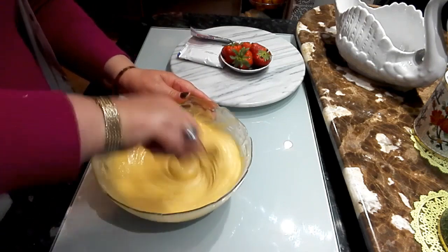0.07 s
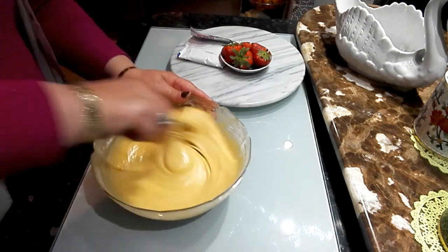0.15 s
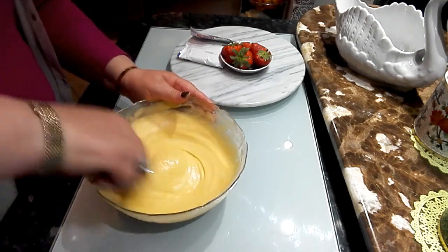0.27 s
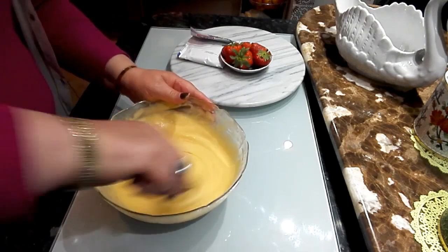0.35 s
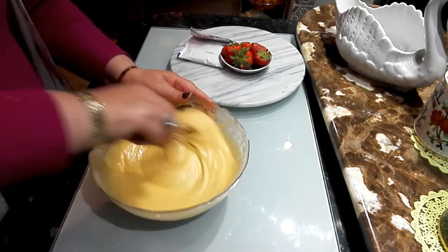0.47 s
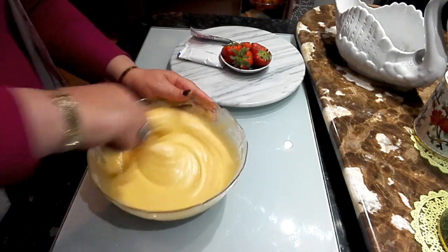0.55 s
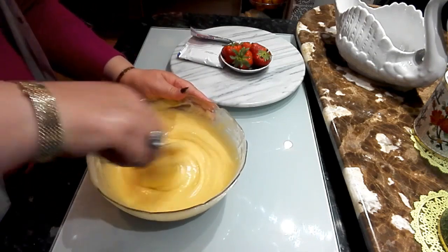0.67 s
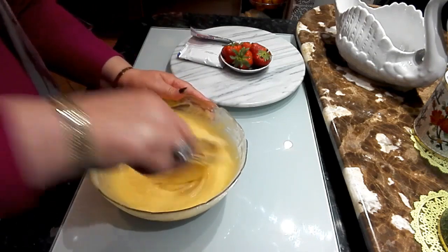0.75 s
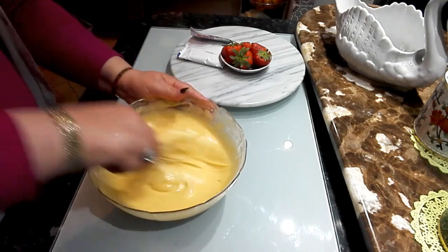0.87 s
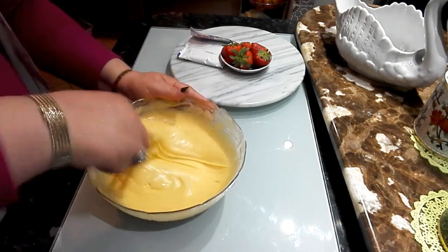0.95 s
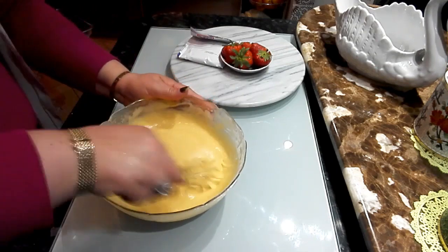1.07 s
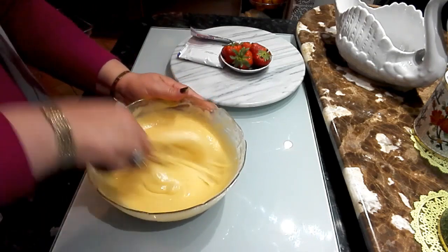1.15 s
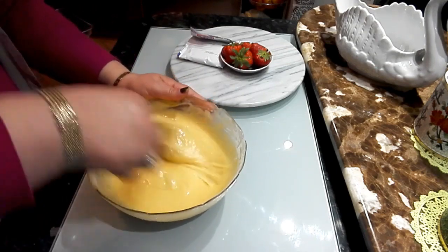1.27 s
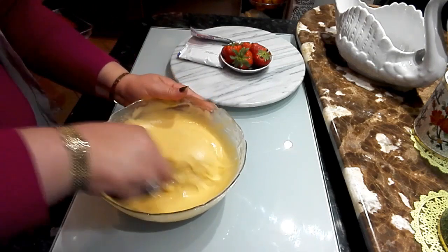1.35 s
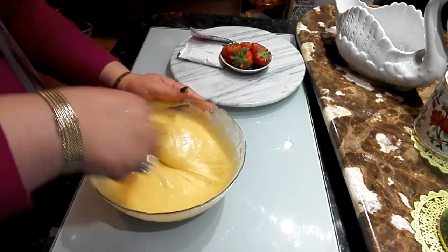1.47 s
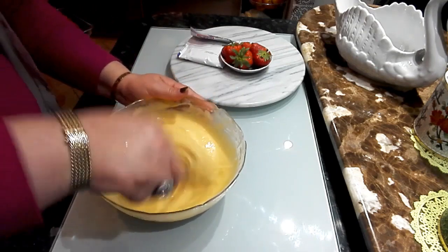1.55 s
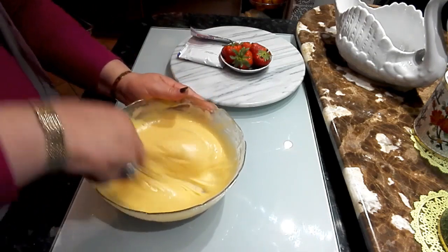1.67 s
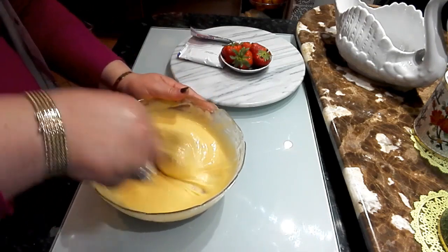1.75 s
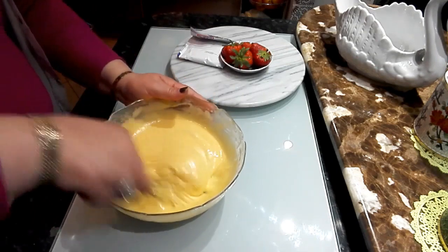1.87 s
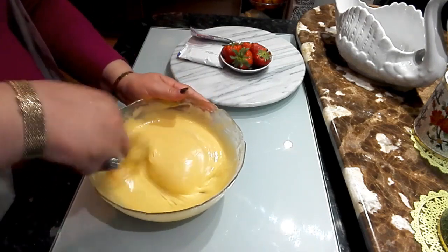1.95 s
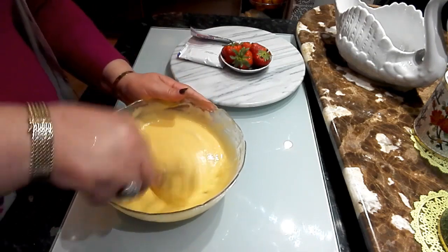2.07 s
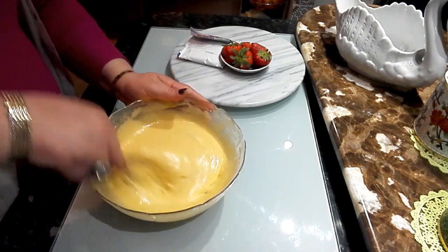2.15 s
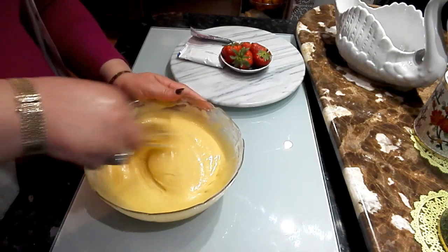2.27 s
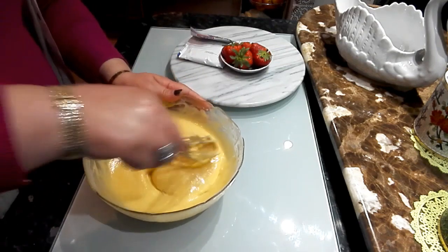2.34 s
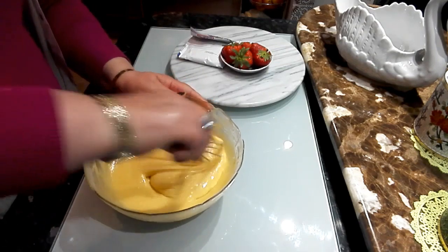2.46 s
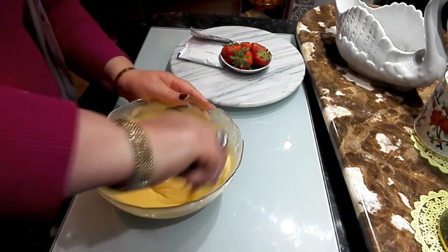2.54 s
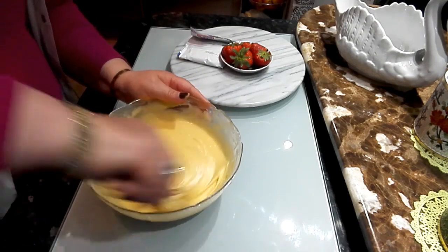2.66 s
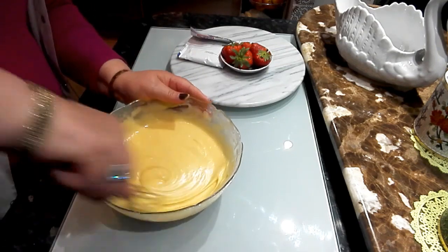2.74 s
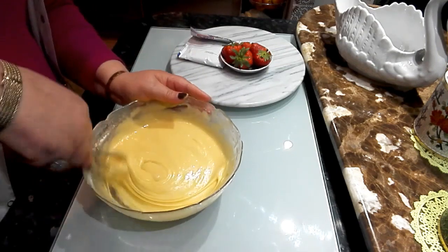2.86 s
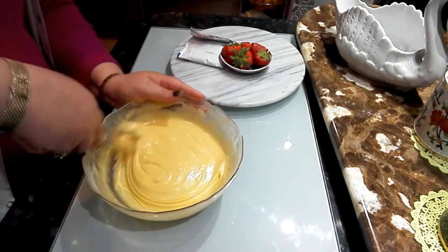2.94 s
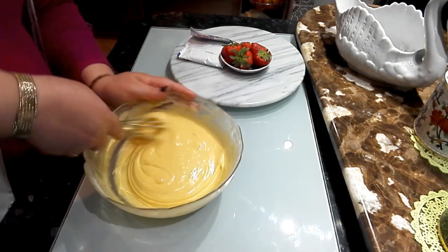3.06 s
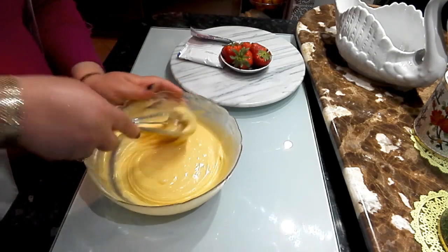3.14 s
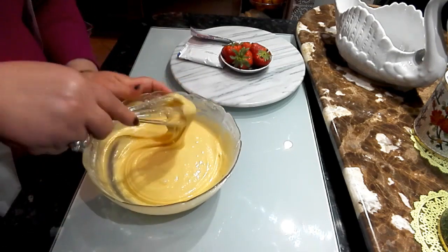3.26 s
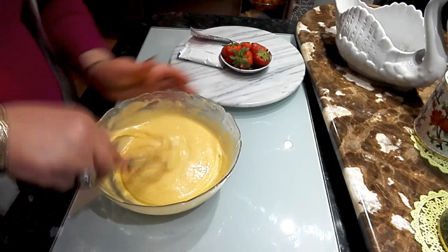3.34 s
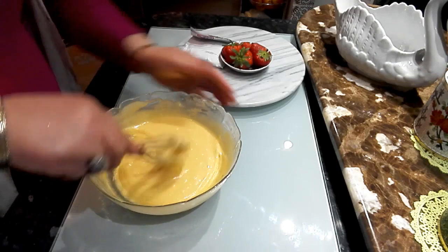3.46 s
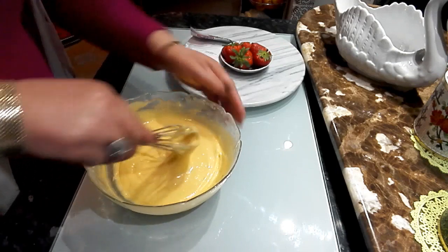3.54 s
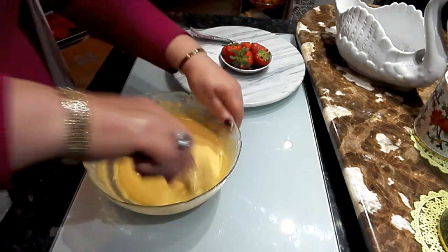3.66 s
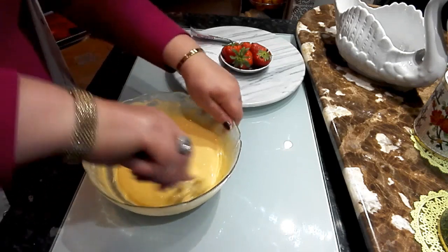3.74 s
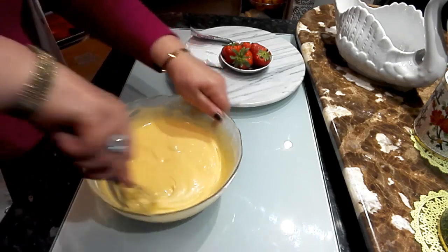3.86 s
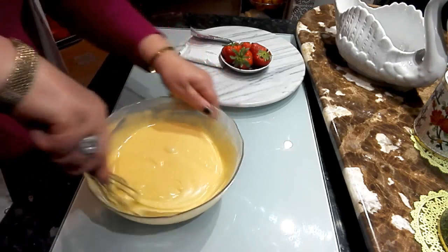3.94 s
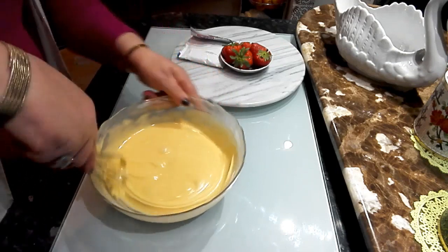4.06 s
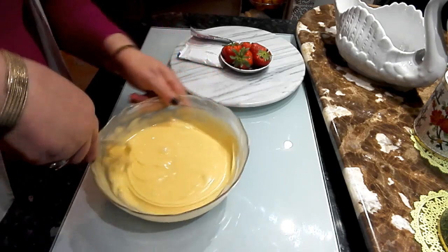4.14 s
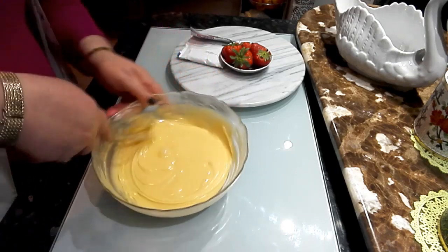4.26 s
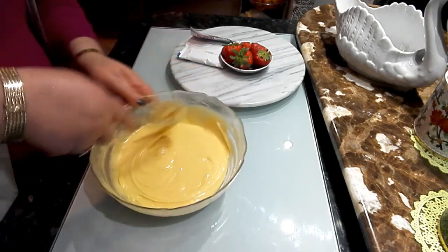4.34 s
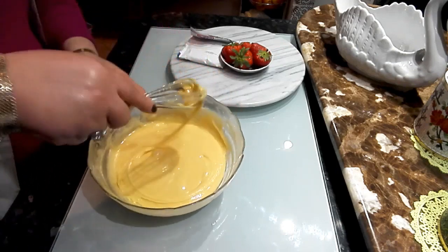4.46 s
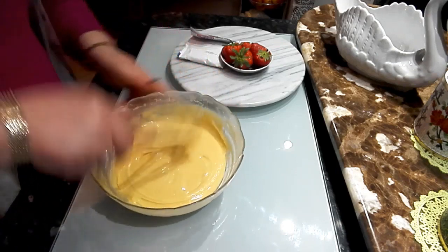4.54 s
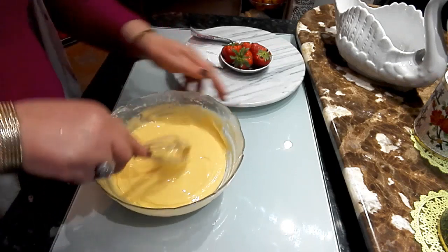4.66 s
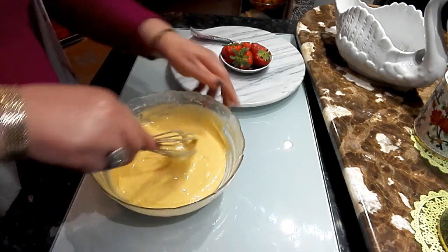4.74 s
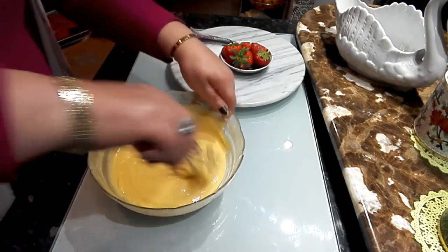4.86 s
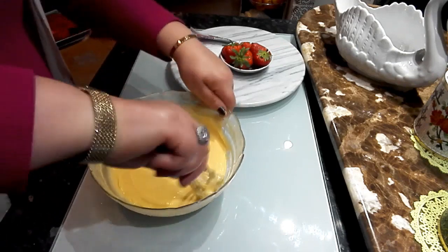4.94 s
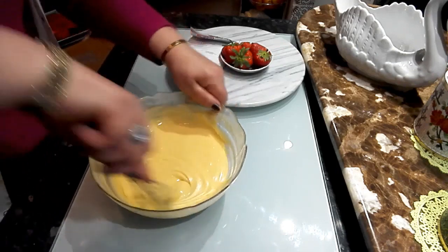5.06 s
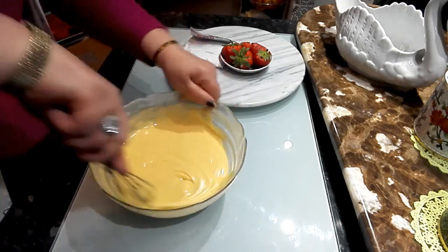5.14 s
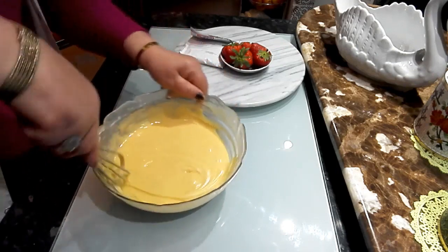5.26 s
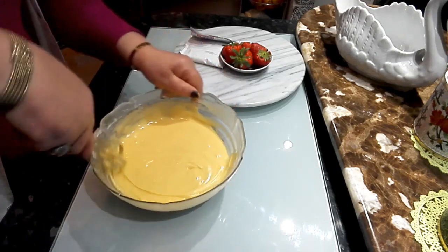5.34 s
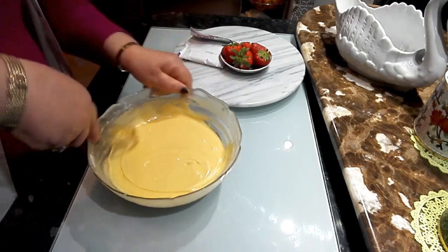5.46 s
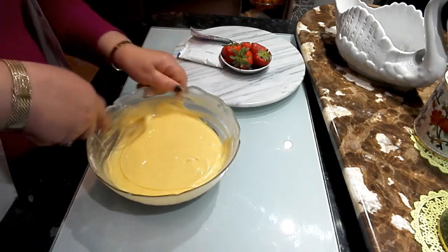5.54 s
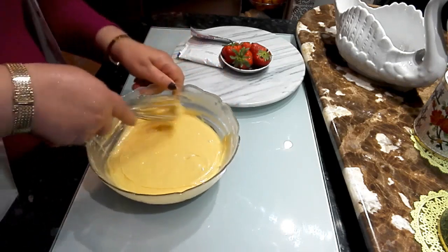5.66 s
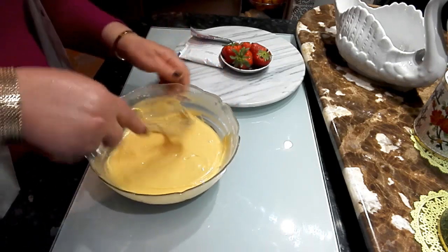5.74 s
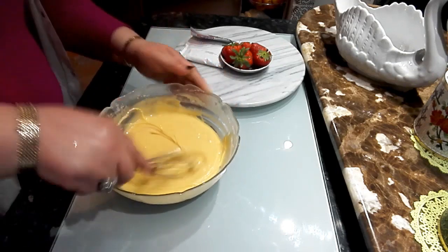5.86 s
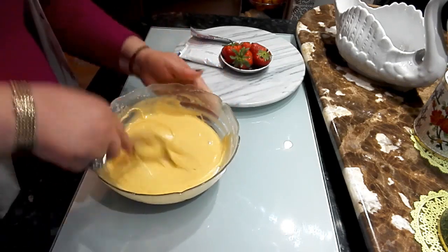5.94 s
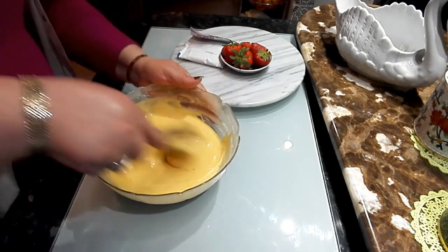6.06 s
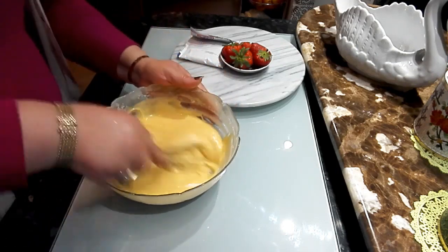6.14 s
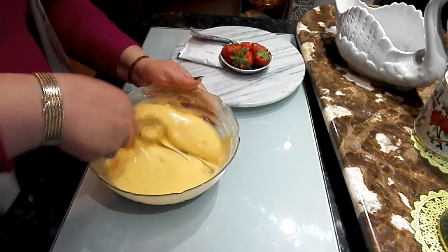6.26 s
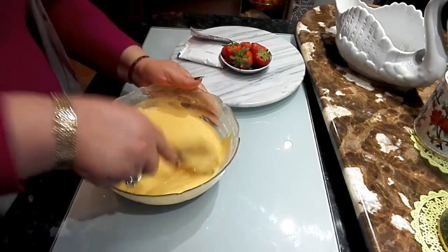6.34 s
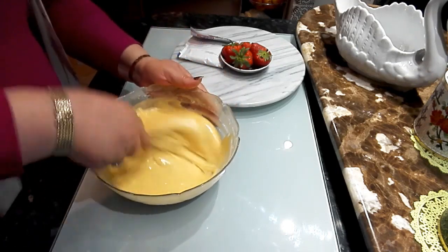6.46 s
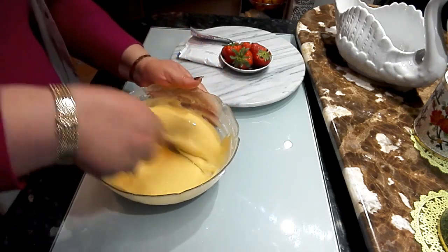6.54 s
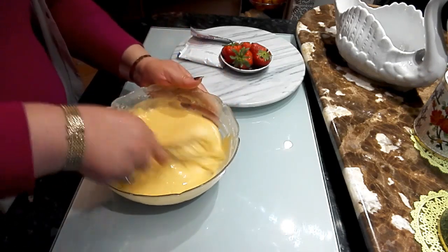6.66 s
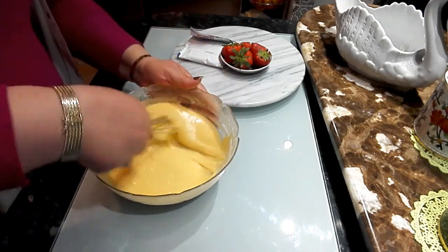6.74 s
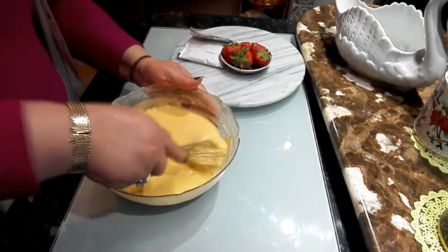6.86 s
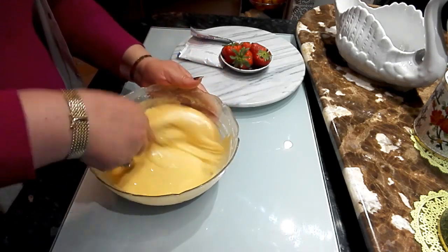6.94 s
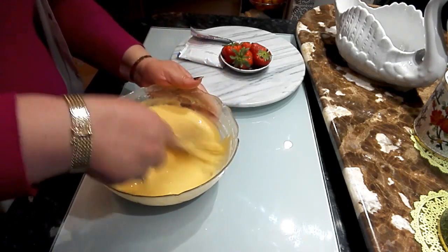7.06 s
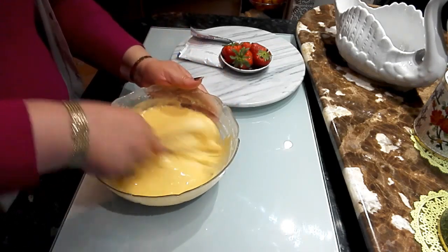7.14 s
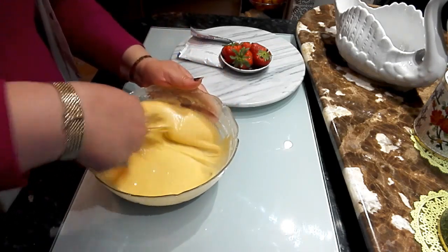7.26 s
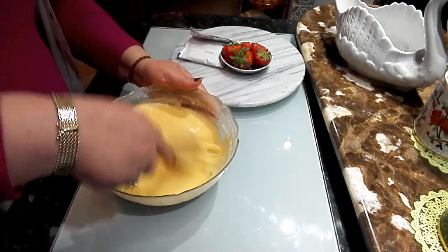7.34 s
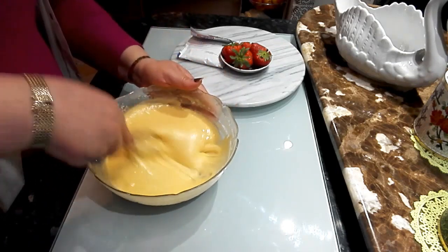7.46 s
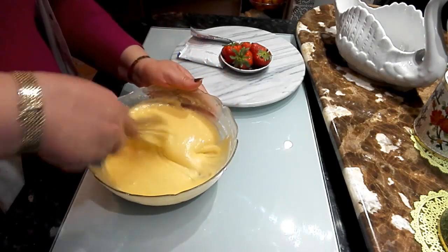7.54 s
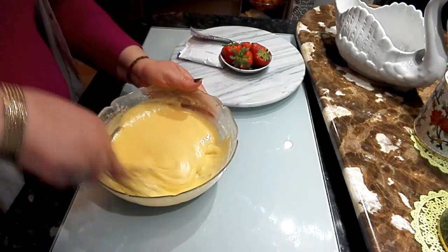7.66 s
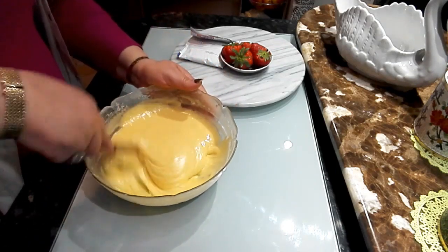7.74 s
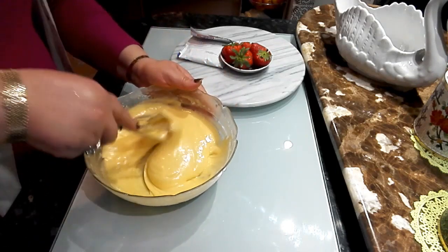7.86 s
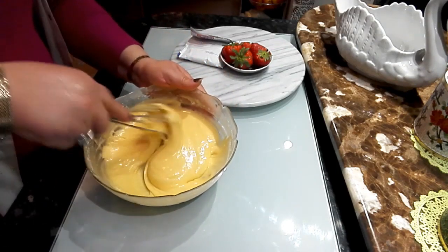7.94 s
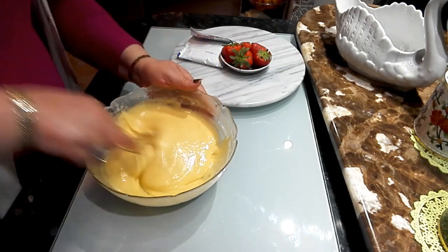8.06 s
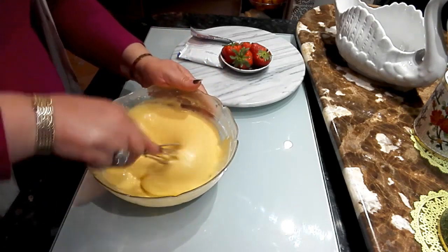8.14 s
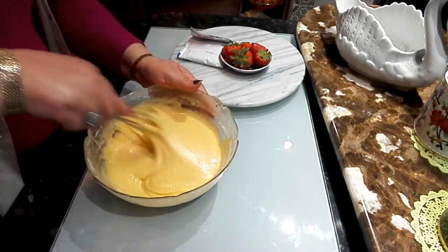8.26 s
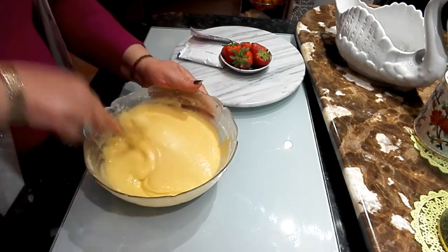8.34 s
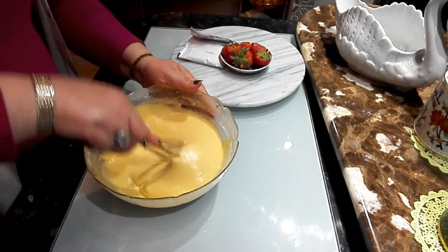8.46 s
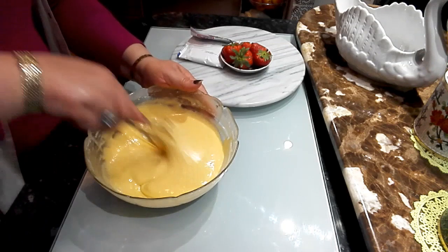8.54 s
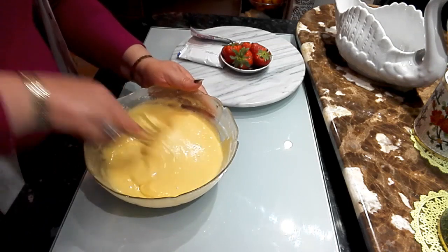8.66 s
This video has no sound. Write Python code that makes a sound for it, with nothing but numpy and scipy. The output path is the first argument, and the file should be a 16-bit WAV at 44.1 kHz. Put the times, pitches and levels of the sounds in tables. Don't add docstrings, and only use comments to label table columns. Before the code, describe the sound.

Close to the microphone, a wire whisk beats batter in a glass bowl, about four strokes a second, each a clustered tick and short scrape. Hard knocks stand out. A quieter middle has light wiping, scattered clacks and brief glassy rings, then fast beating resumes to the end. A small hard kitchen answers, with a faint refrigerator hum behind.

```python
import sys
import numpy as np
from scipy import signal
from scipy.fft import rfft, irfft, next_fast_len
from scipy.io import wavfile
from scipy.ndimage import uniform_filter1d, map_coordinates

SR = 44100
rng = np.random.default_rng(int(sys.argv[2]) if len(sys.argv) > 2 else 0)


def generate_wav(sig):
    pcm = np.round(np.clip(np.atleast_2d(sig).T, -1, 1) * 32767).astype(np.int16)
    wavfile.write(sys.argv[1], SR, pcm)


def gain_from_db(level_db):
    decades = np.asarray(level_db, float) / 20
    return 10 ** decades


N = 383669


def unit(x):
    return x / np.sqrt(np.mean(x ** 2) + 1e-20)


def along(points, hz):
    f, v = np.transpose(points)
    return np.interp(np.log(hz + 1), np.log(f + 1), v)


def wobble(rate):
    coarse = np.arange(0, N + 32, 32)
    knots = rng.standard_normal(int(N * rate / SR) + 4)
    return np.interp(np.arange(N), coarse, map_coordinates(knots, [coarse * rate / SR]))


def filtered(x, response):
    m = next_fast_len(N + SR // 2)
    return irfft(rfft(x, m) * response(np.fft.rfftfreq(m, 1 / SR)), m)[:N]


def resonant(x, peaks):
    f = np.fft.rfftfreq(8192, 1 / SR)
    response = 0
    for k, (hz, width_hz, db) in enumerate(peaks):
        damping = 1j * f * width_hz
        response = response + (-1) ** k * gain_from_db(db) * damping / (hz * hz - f * f + damping)
    kick = irfft(response)
    return signal.oaconvolve(x, kick[:6000] / np.abs(kick).max())[:N]


def ring(hz, db, t60, seconds):
    t = np.arange(round(seconds * SR)) / SR
    return gain_from_db(db - 60 * t / t60) * np.sin(2 * np.pi * hz * t) * (1 - np.exp(-2 * hz * t))


def add(track, s, sound):
    track[round(s * SR):][:len(sound)] += sound


# landing t/s, contact t/s, landing level/dB, lift level/dB, lift sharpness/dB
STROKES = [(0.099, 0.13, -78, -48.5, -11), (0.457, 0.12, -78, -44.5, -11.5),
           (0.897, 0.087, -62.5, -46, -13.5), (1.176, 0.079, -47.5, -45.5, -8.5),
           (1.439, 0.066, -42.5, -45.5, -0.5), (1.689, 0.07, -38.5, -42.5, -7),
           (1.941, 0.048, -43.5, -43.5, -8), (2.225, 0.038, -56.5, -47.5, -9.5),
           (5.96, 0.062, -53.5, -45, -8), (6.229, 0.087, -63.5, -42.5, -13.5), (6.5, 0.081, -43, -48, -16),
           (6.73, 0.078, -50.5, -45, -16.5), (6.972, 0.085, -54, -52.5, -19.5),
           (7.208, 0.09, -60.5, -47.5, -20), (7.47, 0.071, -64.5, -44.5, -6),
           (7.737, 0.084, -55.5, -59.5, -19), (8.123, 0.12, -51.5, -46.5, -8),
           (8.447, 0.086, -54.5, -41.5, -12)]


def strokes():
    skid_s, skid_db = 0.017, 10
    release_s, release_db = 0.08, -41.5
    landing_dull_db, release_dull_db = -7, -8
    moves = []
    for s, hold_s, land_db, lift_db, sharp_db in STROKES:
        moves.append([
            (s, land_db + skid_db, sharp_db + landing_dull_db),
            (s + skid_s, land_db, sharp_db + landing_dull_db),
            (s + max(hold_s, skid_s + .002), lift_db, sharp_db),
            (s + hold_s + release_s, lift_db + release_db, sharp_db + release_dull_db)])
    return moves


# t/s, peak level/dB, contact pitch f/Hz, sharpness level/dB
LANDINGS = [(0.093, -41, 4740, -22), (0.4592, -39, 4470, -18.5), (0.902, -43, 3360, -29),
            (1.1761, -21, 2020, -38.5), (1.4387, -5, 3800, -26.5), (1.6878, -9.5, 1730, -17.5),
            (1.9402, -28.5, 3660, -34), (2.2232, -44, 2840, -18), (2.6349, -51, 1550, -24),
            (3.4797, -9.5, 5070, -13.5), (3.801, -42, 1460, -22), (4.6816, -20.5, 4160, -16),
            (5.0358, -10.5, 4550, -20.5), (5.963, -15, 3270, -18), (6.2292, -34, 4400, -32),
            (6.4962, -3.5, 5500, -19.5), (6.73, -26, 1980, -43), (6.9686, -29.5, 2330, -35),
            (7.214, -23.5, 1760, -33), (7.4763, -47, 4320, -17), (7.738, -36.5, 3570, -44),
            (8.1143, -31.5, 4140, -23.5), (8.4367, -34, 4770, -15.5)]
# t/s, peak level/dB, contact pitch f/Hz
FOLLOWERS = [(0.1297, -29.5, 5430), (0.2128, -28.5, 3080), (0.22, -47, 5000), (0.237, -40, 3130),
             (0.2425, -33.5, 2030), (0.502, -41, 5450), (0.547, -33.5, 4040), (0.581, -45, 1470),
             (0.939, -38, 3900), (0.954, -35, 4560), (0.961, -39, 4560), (0.976, -41, 3280),
             (0.982, -39, 5070), (1.182, -26, 5600), (1.2, -29, 2970), (1.251, -33, 2740),
             (1.2563, -24.5, 3220), (1.961, -27.5, 5040), (5.9953, -25, 2370), (6, -32, 1450),
             (6.002, -31.5, 3800), (6.014, -39, 4200), (6.037, -35, 5570), (6.2302, -41, 1510),
             (6.269, -30.5, 1510), (6.296, -30.5, 2330), (6.2685, -24.5, 3050), (6.3124, -24.5, 3760),
             (6.4923, -25, 3270), (6.5003, -26, 5320), (6.504, -27, 5450), (6.555, -29, 3000),
             (6.7255, -40, 1600), (6.772, -36, 4750), (6.804, -38, 4730), (6.811, -33, 4400),
             (6.8163, -32, 3660), (6.976, -36.5, 4920), (7.0319, -41, 3250), (7.0485, -35, 3580),
             (7.0607, -35.5, 4750), (7.064, -37, 3210), (7.214, -27, 4230), (7.2285, -39, 5050),
             (7.2695, -38, 1910), (7.289, -44, 4260), (7.298, -39.5, 4240), (7.303, -32, 3220),
             (7.3036, -34, 1800), (7.482, -52, 7500), (7.503, -36, 5450), (7.5382, -34, 4400),
             (8.125, -31.5, 5520), (8.1259, -31, 1450), (8.1539, -30.5, 5300), (8.181, -36, 4860),
             (8.186, -36, 1710), (8.191, -41, 4500), (8.207, -27.5, 3420), (8.449, -23.5, 4700),
             (8.4902, -25, 5200), (8.508, -27, 1400), (8.536, -31.5, 7100), (8.545, -26.5, 2320)]
# t/s, peak level/dB, contact pitch f/Hz
GRAZES = [(0.0054, -50.5, 2730), (0.144, -51, 5500), (0.159, -44, 5200), (0.205, -41, 4900),
          (0.356, -34.5, 4280), (0.5298, -41, 5060), (0.643, -55, 1550), (0.6853, -55, 4470),
          (2.7714, -55.5, 1520), (2.802, -54, 1540), (2.8066, -49.5, 5900), (2.8379, -51, 6800),
          (2.874, -48.5, 4770), (2.994, -51, 3440), (3.016, -38.5, 7150), (3.023, -43, 3360),
          (3.046, -47, 3400), (3.1418, -58.5, 5800), (3.488, -35, 5030), (3.7, -70, 4300),
          (3.9671, -52, 4700), (3.9803, -41, 4570), (4.0496, -45, 5943), (4.0708, -47.5, 4400),
          (4.1006, -51, 3660), (4.126, -49, 3840), (4.135, -41.5, 4540), (4.16, -49, 5540),
          (4.1784, -41.5, 5630), (4.2179, -49, 1320), (4.2837, -58, 3430), (5.24, -55.5, 4540),
          (5.271, -56, 3800), (5.3073, -44, 4550), (5.3318, -47, 4570), (6.866, -52, 4830),
          (7.1102, -53, 4930), (7.3652, -46.5, 4950), (7.469, -59, 4320), (7.4938, -36.5, 1460),
          (7.609, -51, 2900), (7.702, -61, 4340), (7.748, -45, 3550), (7.814, -46, 4900),
          (7.8282, -28, 5000), (7.861, -46, 4640)]
# t/s, peak level/dB
SNAPS = [(0.123, -36), (0.2683, -41), (0.476, -39), (0.993, -30), (1.181, -37), (1.1954, -23),
         (1.5016, -29), (1.507, -31), (6.5757, -28), (6.741, -29), (8.23, -22.5), (8.566, -31.5)]


def contacts():
    when, _, sharp_db = np.vstack(strokes()).T
    follow = [(s, db, hz, np.interp(s, when, sharp_db) - 3.5) for s, db, hz in FOLLOWERS]
    graze = [(s, db, hz, -19.5) for s, db, hz in GRAZES]
    snap = [(s, db - 5.0, 4700, -17) for s, db in SNAPS]
    return LANDINGS + follow + graze + snap


# f/Hz, width f/Hz, level/dB
WALL = [(1325, 614, -0.5), (2510, 630, 1.5), (3360, 930, 2.5), (4550, 750, 5), (5217, 1140, 2),
        (7150, 200, -10.5)]
# f/Hz, width f/Hz, level/dB
EDGE = [(7130, 1500, 13), (9940, 1500, 12.5), (12040, 4500, 7)]


def ticks():
    wall, edge, tone = np.zeros((3, N + SR))
    t = np.arange(SR // 50) / SR
    hz_axis = np.fft.rfftfreq(len(t), 1 / SR) + 1
    elsewhere = np.array([s for s, db in TAPS + CLINKS + PEALS + JINGLE])
    for s, db, hz, sharp_db in contacts():
        aside = np.abs(elsewhere - s).min() < .003
        db -= 11 * aside
        shape = gain_from_db(-60 * t / 0.011) * (1 - np.exp(-t / 0.00016))
        burst = rfft(shape * rng.standard_normal((2, len(t))))
        even = burst / (uniform_filter1d(np.abs(burst), size=9) + 1e-9)
        even[0] *= gain_from_db(-6.5 * np.abs(np.log2(hz_axis / hz)) + 2)
        burst = gain_from_db(db) * irfft(even, len(t)) * np.linalg.norm(shape)
        for lead_s, lead_db in ((0, 0), (.004, -20 - 30 * aside)):
            add(wall, s - lead_s, gain_from_db(lead_db - 13.5) * burst[0])
            add(edge, s - lead_s, gain_from_db(4.2 * lead_db + sharp_db - 1.5) * burst[1])
        add(tone, s, ring(hz, db - 4.5, 0.011, .04) * (not aside))
    return resonant(wall[:N], WALL) + resonant(edge[:N], EDGE) + tone[:N]


# t/s, peak level/dB
TAPS = [
    (1.4399, -14),
    (1.6865, -17.5),
    (3.4796, -14),
    (4.6812, -23),
    (5.9627, -18.5),
    (6.496, -13),
]
# f/Hz, width f/Hz, level/dB
SPOTS = [
    [(1473, 360, -3), (2540, 180, -4.5), (3640, 530, 4), (5300, 620, -2), (7360, 670, -12)],
    [(550, 340, -7), (1370, 550, -2.5), (1806, 207, -1.5), (3050, 510, -8), (4990, 1000, -14.5),
     (7200, 2700, -19)],
    [(1670, 1200, -18), (2950, 340, -7.5), (4540, 530, -7), (5200, 500, 2.5), (6600, 610, -7.5),
     (7740, 500, -6)],
    [(815, 33, -6), (1320, 72, 8), (2400, 210, -14), (3420, 180, -17), (4060, 320, -0.5), (5450, 340, -3.5),
     (8300, 1800, -11.5)],
    [(737, 60, -3), (2090, 290, -1.5), (3400, 440, 1.5), (4400, 870, -1.5), (5280, 350, 4.5),
     (6660, 1100, -1.5)],
    [(2152, 55, -2), (3400, 37, -2), (4250, 1000, -11.5), (5450, 460, -4), (8350, 1700, -14.5)],
]


def taps():
    out = np.zeros(N + SR)
    for (s, db), spot in zip(TAPS, SPOTS):
        blow = np.zeros(SR // 100)
        add(blow, 0, gain_from_db(db - 5.0) * np.hanning(5))
        add(blow, 0.000827, -gain_from_db(db - 22.0) * np.hanning(5))
        add(blow, 0.0026, gain_from_db(db - 15) * np.hanning(5))
        add(out, s, resonant(blow, spot))
    return out[:N]


def shifting(x, depth_db):
    z = signal.stft(x, nperseg=256)[2]
    field = uniform_filter1d(rng.standard_normal(z.shape), size=3, axis=0)
    field = uniform_filter1d(field, size=14, axis=1)
    return unit(signal.istft(z * gain_from_db(depth_db * unit(field)), nperseg=256)[1][:N])


def slips(rate):
    grains = (rng.random(N) < rate / SR) * rng.standard_normal(N)
    return unit(grains * gain_from_db(2.1 * wobble(120) + 1.2 * wobble(30)))


# f/Hz, level/dB, t60/s
RIM = [(926, -7, .18), (1615, -3, .26), (2444, -5, .22), (3413, 0, .28), (4530, 0, .27), (5740, -1, .2),
       (7200, -17, .12)]


def drag(moves, rim_db, low, low_db):
    t, force, sharp = np.arange(N) / SR, np.zeros(N), np.zeros(N)
    for s, level_db, sharp_db in map(np.transpose, moves):
        start_s, end_s = s[0] - .004, s[-1] + .02
        part = slice(round(start_s * SR), round(end_s * SR))
        press = gain_from_db(np.interp(t[part], [start_s, *s, end_s], [-95, *level_db, -95]) - 5.5)
        force[part] += press
        sharp[part] += press * gain_from_db(np.interp(t[part], s, sharp_db))
    rub = slips(2000)
    body = shifting(resonant(rub, WALL), depth_db=1.0) + gain_from_db(low_db) * unit(resonant(slips(700), low))
    scrape = gain_from_db(5.0) * unit(resonant(slips(5400), EDGE))
    rim = [(hz, 35, db) for hz, db, t60 in RIM]
    singing = resonant(force * rub, rim) / np.std(resonant(rub, rim))
    return force * body + sharp * scrape + gain_from_db(rim_db) * singing


def sweeps(rows, sharp_db, fade_db):
    moves = []
    for s, db, rise_s, crest_db, fade_s in rows:
        crest_s = s + rise_s
        moves.append([(s, db, sharp_db), (crest_s, crest_db, sharp_db),
                      (crest_s + fade_s, crest_db + fade_db, sharp_db)])
    return moves


# start t/s, start level/dB, rise t/s, crest level/dB, fade t/s
TRAILS = [
    (1.27, -60.5, 0.15, -50.5, .136),
    (1.82, -68, .03, -64.5, 0.49),
    (6.83, -59, 0.096, -64, .03),
    (7.83, -65, .02, -63.5, 0.032),
]
# f/Hz, width f/Hz, level/dB
FOOT = [(290, 42, 6.5), (783, 860, -7)]


def beating():
    moves = strokes() + sweeps(TRAILS, sharp_db=-26, fade_db=-13.5)
    return drag(moves, rim_db=-26.0, low=FOOT + BELLY, low_db=-8.5)


# start t/s, start level/dB,
# rise t/s, crest level/dB, fade t/s
WIPES = [(2.635, -75.5, .03, -75, .9), (2.79, -74, 0.21, -59, .09), (3.27, -76, 0.27, -83.5, .8),
         (3.45, -79, 0.019, -56, .01), (3.8, -56.5, .03, -60, .31), (3.9, -69, 0.28, -66.5, .22),
         (4.665, -85, 0.015, -70, .01), (4.87, -72, 0.097, -72.5, .05), (5.045, -50.5, 0.079, -60.5, .19),
         (5.27, -72, 0.3, -78.5, .2), (5.91, -68, .05, -67, .01), (6.46, -76, 0.028, -63, .01)]


def wiping():
    return drag(sweeps(WIPES, sharp_db=-23, fade_db=-28), rim_db=-5.5, low=BELLY, low_db=-13.0)


# start t/s, length t/s, pitch f/Hz, width f/Hz, level/dB rms
SQUEAKS = [(0.123, 0.028, 1320, 300, -57), (0.963, 0.069, 3100, 500, -57.5), (0.351, 0.062, 3150, 200, -75),
           (1.441, 0.031, 3120, 500, -59), (1.692, 0.047, 794, 500, -52), (1.255, 0.063, 3100, 300, -70),
           (1.879, 0.086, 2820, 298, -73), (1.941, 0.045, 3150, 706, -45), (1.954, 0.027, 1380, 300, -49),
           (1.96, 0.01, 4960, 500, -54), (1.984, 0.072, 3000, 400, -60), (2.638, 0.085, 1470, 200, -72.5),
           (2.799, 0.17, 6100, 900, -74), (2.8, 0.34, 1480, 203, -77), (3.008, 0.11, 3540, 300, -78),
           (3.812, 0.15, 1500, 300, -67), (3.949, 0.053, 2470, 100, -77), (4.099, 0.11, 3800, 700, -65.5),
           (4.14, 0.035, 1320, 200, -74), (4.2, .06, 5800, 300, -75), (4.877, 0.1, 2420, 500, -74),
           (4.892, 0.098, 1500, 200, -76.5), (6.292, 0.13, 3320, 400, -62), (6.298, 0.04, 10300, 1500, -56),
           (6.508, 0.033, 5700, 800, -57), (6.867, 0.11, 2780, 250, -70.5), (7.036, 0.06, 3320, 400, -66),
           (7.036, 0.11, 5000, 500, -78), (7.499, 0.087, 1480, 402, -63), (7.527, 0.037, 5150, 1200, -51.5),
           (7.591, 0.037, 2940, 250, -70.5), (7.868, 0.11, 2640, 300, -72), (7.859, 0.08, 5200, 900, -68.5),
           (7.858, 0.11, 3850, 300, -73), (8.52, 0.082, 2280, 300, -64.5), (8.508, 0.12, 1440, 250, -68),
           (3.75, 0.056, 4520, 303, -76.5), (3.81, 0.11, 5130, 1200, -79), (8.2, 0.062, 2400, 200, -49.5),
           (8.204, 0.052, 5660, 900, -49.5)]


def squeaks():
    out = np.zeros(N + SR)
    for s, length_s, hz, width_hz, db in SQUEAKS:
        grains = rng.standard_normal((2, SR // 2))[:, :round(length_s * SR)]
        rub = grains[0] * gain_from_db(5 * unit(uniform_filter1d(grains[1], size=200)))
        edges = [hz - width_hz / 2, hz + width_hz / 2]
        narrow = signal.butter(1, edges, "bandpass", fs=SR, output="sos")
        sung = unit(signal.sosfilt(np.vstack([narrow, narrow]), rub))
        swell = np.interp(np.linspace(0, 1, len(rub)), [0, 0.11, 1 - .45, 1], [0, 1, 1, 0])
        add(out, s, gain_from_db(db) * sung * swell)
    return out[:N]


# t/s, rocking level/dB, rocking f/Hz, flexing level/dB, belly level/dB
KNOCKS = [(0.243, -59.5, 271, -58, -49), (0.265, -64, 290, -54.5, -48.5), (0.294, -60.5, 290, -60, -59),
          (0.585, -52, 250, -54, -42.5), (0.937, -47.5, 291, -62, -51.5), (1.175, -50.5, 264, -41.5, -33.5),
          (1.44, -41.5, 267, -45, -36), (1.684, -54.5, 487, -38, -21.5), (1.955, -49.5, 406, -52, -44),
          (2.223, -52, 295, -76, -55), (2.635, -63.5, 292, -82, -57), (3.04, -68, 290, -62, -61.5),
          (3.482, -35.5, 288, -37, -51.5), (3.801, -68, 301, -68, -50.5), (4.684, -49.5, 311, -55, -44.5),
          (5.034, -60.5, 468, -51.5, -44), (5.962, -68.5, 350, -42, -42.5), (6.266, -53.5, 298, -59.5, -48),
          (6.494, -42, 298, -44.5, -13), (6.74, -55, 294, -49.5, -44), (6.772, -56, 290, -52.5, -52),
          (6.966, -69, 400, -62, -45.5), (7.214, -41.5, 280, -49, -55), (7.269, -49.5, 292, -60, -54),
          (7.321, -55.5, 263, -63, -56), (7.503, -63, 413, -75, -53), (8.187, -51, 290, -56, -59),
          (8.207, -51, 290, -54.5, -41), (8.488, -47, 283, -52.5, -49)]
# f/Hz, level/dB, t60/s
FLEX = [(728, -0.5, 0.036), (821, -3.5, .025)]
# f/Hz, width f/Hz, level/dB
BELLY = [(1253, 160, 0.5), (1600, 260, -0.5), (1980, 130, -4.5)]


def knocks():
    bowl, belly = np.zeros((2, N + SR))
    for s, rock_db, rock_hz, flex_db, belly_db in KNOCKS:
        add(bowl, s, ring(rock_hz, rock_db + 5.0, 0.075, .2))
        add(bowl, s, ring(rock_hz * 1.4, rock_db + 6.0 - 6, .04, .2))
        for hz, db, t60 in FLEX:
            add(bowl, s, ring(hz, flex_db + 5.5 + db, t60, .2))
        if min(abs(s - tap_s) for tap_s, db in TAPS) > .006:
            add(belly, s, gain_from_db(belly_db + 6.5) * np.hanning(7) / 3)
    return bowl[:N] + resonant(belly[:N], BELLY)


def struck(touches, modes, gain_db, scatter_db=6.5):
    out = np.zeros(N + SR)
    for s, db in touches:
        for (hz, level_db, t60), chance in zip(modes, rng.standard_normal((len(modes), 2))):
            uneven_db, detune = chance * [scatter_db, .002]
            mode_db = db + gain_db + level_db + uneven_db
            for split, pair_db in ((.996, -7), (1, -16.5), (1.009, -10)):
                add(out, s, ring(hz * split * (1 + detune), mode_db + pair_db, t60, 0.37))
    return out[:N]


# t/s, peak level/dB
PEALS = [
    (3.8075, -35),
    (5.0357, -24.5),
]
PEAL_MODES_DB = [
    [-24, 2, -15, 1.5, -2, -24, -28],
    [-13, -1.7, -1.5, 3.5, 4.5, 0, -9],
]
PEAL_HELD = [0.76, 1.3]


def peals():
    out, flutter = 0, gain_from_db(2 * wobble(90))
    for blow, modes_db, held in zip(PEALS, PEAL_MODES_DB, PEAL_HELD):
        for (hz, _, t60), db in zip(RIM, modes_db):
            slow = struck([blow], [(hz, db - 1, t60 * held)], gain_db=-25.5, scatter_db=2.5)
            quick = struck([blow], [(hz, db + 15, t60 * 0.2)], gain_db=-25.5, scatter_db=2.5)
            out = out + quick + slow * np.roll(flutter, hz * 20)
    return out


# f/Hz, level/dB, t60/s
BASE = [(350, -1.5, 0.25), (845, -6.5, 0.19)]


def foot_ring():
    return struck(TAPS[3:4], BASE, gain_db=-25.0, scatter_db=-1.0)


# t/s, peak level/dB
CLINKS = [
    (0.3562, -55.5),
    (3.9792, -55),
    (7.8273, -52),
]


def clinks():
    return struck(CLINKS, RIM, gain_db=-17.0)


# t/s, peak level/dB
JINGLE = [
    (5.2741, -50),
    (5.307, -51),
    (5.331, -51),
    (5.4251, -60.5),
]
# f/Hz, level/dB, t60/s
WIRES = [(3760, 0, 0.047), (4570, 0.5, 0.068), (5680, -4, 0.065)]


def jingle():
    return struck(JINGLE, WIRES, gain_db=-8.5)


# delay t/s, level/dB
ECHOES = [(.0022, -15), (.0049, -14.5), (.0078, -23.5), (0.0132, -25.5)]


def echoes(x):
    return sum(gain_from_db(db) * np.roll(x, round(s * SR)) for s, db in ECHOES)


# f/Hz, t60/s
KITCHEN = [(200, 0.23), (1400, 0.26), (4000, 0.23), (10000, 0.2), (16000, 0.18)]


def kitchen(x):
    out, step = np.zeros(N + 2 * SR), SR // 4
    for start in range(0, N, step):
        hz, t, z = signal.stft(rng.standard_normal(SR // 2), SR, nperseg=256)
        decay = gain_from_db(-60 * t / along(KITCHEN, hz)[:, None])
        tail = signal.istft(z * decay, SR, nperseg=256)[1]
        wet = signal.fftconvolve(x[start:start + step], tail / np.linalg.norm(tail))
        add(out, start / SR + 0.0022, wet)
    return out[:N]


# f/Hz, level/dB rms
MOTOR = [(49.23, -82), (98.46, -76.5), (100.02, -77.5)]
# t/s, level/dB
LOAD = [(0, -0.5), (1.2, 3), (2.5, 1.5), (5.5, -2.5), (6.5, 1.5), (8.7, 3)]
# f/Hz, level/dB rms
HUM = [(179.5, -84.5), (224.5, -77), (245, -82), (290, -94), (408, -88.5)]
# t/s, level/dB
BUZZ = [
    (0.66, -63.5),
    (1.45, -68.5),
    (2.13, -65),
    (2.649, -71),
    (3.3, -79),
    (5.25, -80),
    (5.951, -74),
    (6.85, -66),
    (7.3, -65.5),
    (8.1, -70.5),
]


def refrigerator():
    t = np.arange(N) / SR
    beat_s = .354
    motor = sum(gain_from_db(db + 2.5) * np.cos(2 * np.pi * hz * (t - beat_s) + .35 * wobble(15)) for hz, db in MOTOR)
    motor = motor * gain_from_db(np.interp(t, *np.transpose(LOAD)) + 1.2 * wobble(4.4))
    casing = 0
    for hz, db in HUM:
        casing = casing + gain_from_db(db + 2 + 4.1 * wobble(4)) * np.cos(2 * np.pi * hz * t + 1.63 * wobble(9.9))
    swells = gain_from_db(-78) + sum(gain_from_db(db) * np.exp(-((t - s) / 0.12) ** 2) for s, db in BUZZ)
    buzz = gain_from_db(4.2 * wobble(18) - 1.5) * np.cos(4 * np.pi * MOTOR[2][0] * t + 1.3 * wobble(14))
    return motor + casing + swells * buzz


# f/Hz, level/dB per Hz
AIR = [(12, -49.5), (20, -17), (53, -3), (69, -11.5), (102, -12), (156, -8.5), (237, -10), (440, -17),
       (652, -24), (994, -20), (1140, -23.5), (3520, -26.5), (13600, -35.5), (14400, -44), (16500, -47)]


def room_air():
    air = unit(filtered(rng.standard_normal(N), lambda hz: gain_from_db(along(AIR, hz))))
    return gain_from_db(-76.5 + 4.5 + 1.1 * wobble(1.685)) * air


def scene():
    whisk = ticks() + taps() + beating() + wiping() + squeaks()
    whisk = whisk + knocks() + peals() + foot_ring() + clinks() + jingle()
    near = whisk + echoes(whisk)
    return (near + gain_from_db(-5.0) * kitchen(whisk) + refrigerator() + room_air())[None]


def roll_off(x):
    return signal.sosfilt(signal.butter(12, 16970, fs=SR, output="sos"), x)


def record(dry):
    heard = filtered(dry[0], lambda hz: 1 / np.sqrt(1 + (hz / 15500) ** 120))
    return roll_off(heard[None])


dry = scene()
out = record(dry)
generate_wav(out)
```